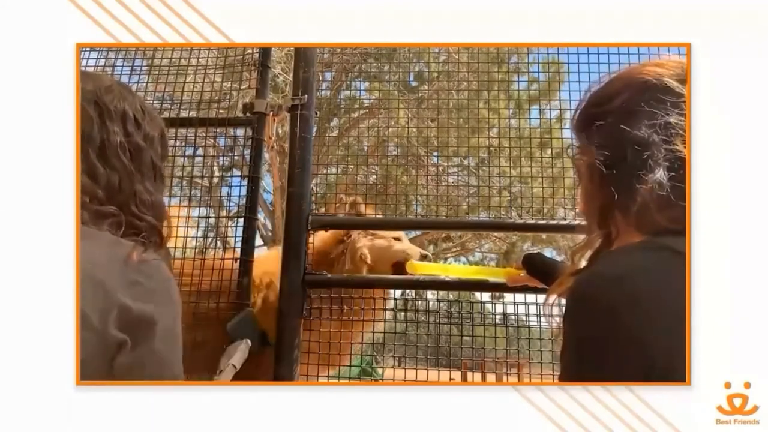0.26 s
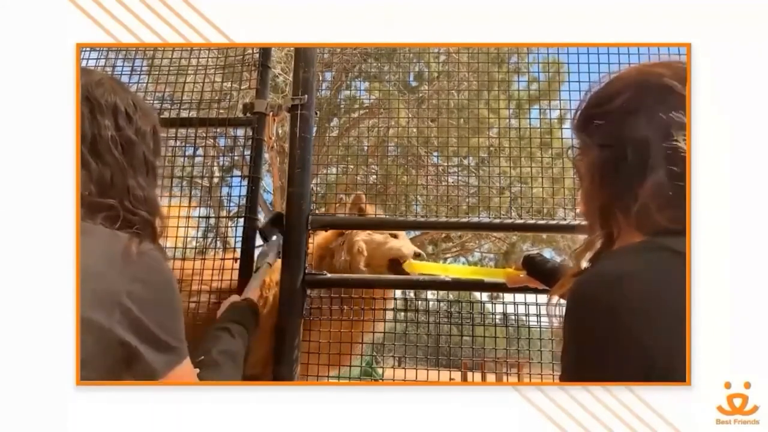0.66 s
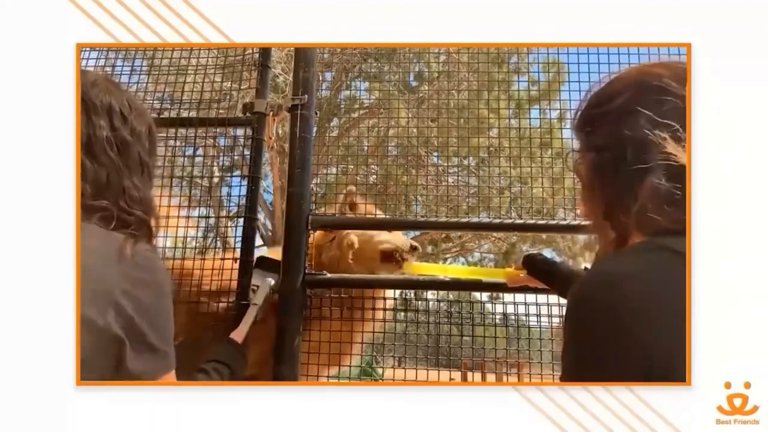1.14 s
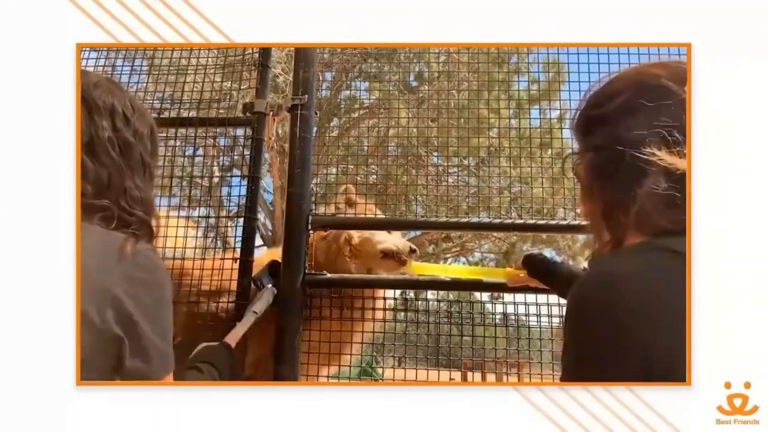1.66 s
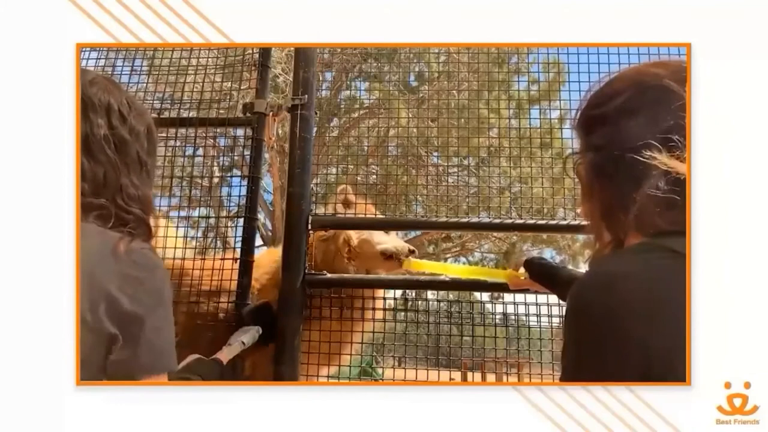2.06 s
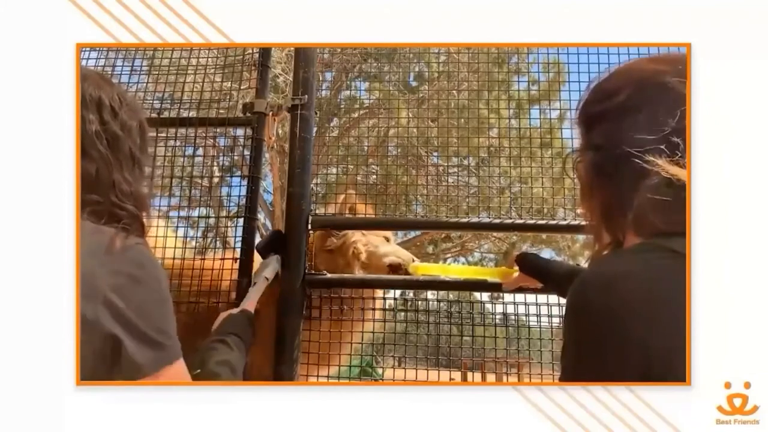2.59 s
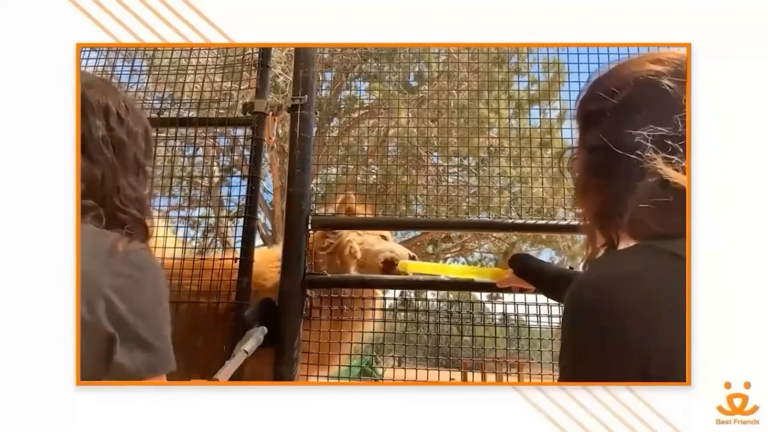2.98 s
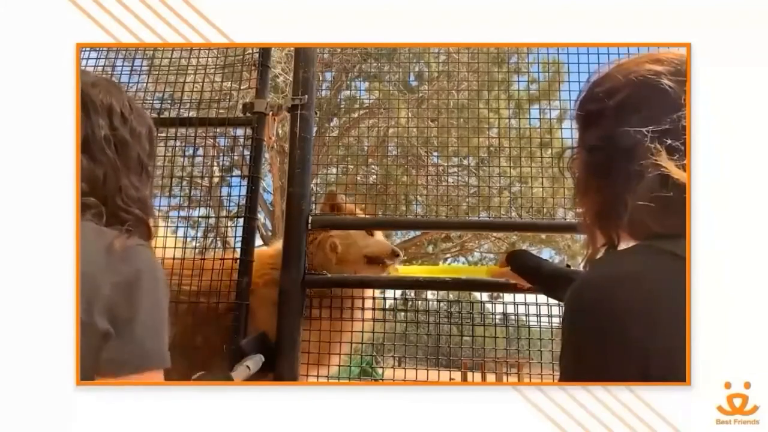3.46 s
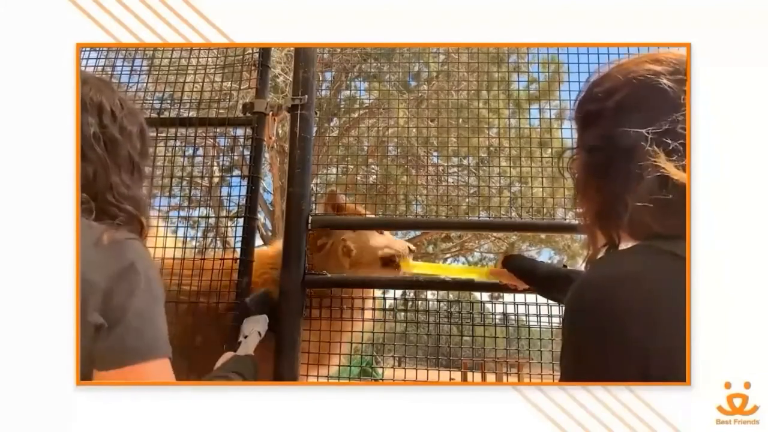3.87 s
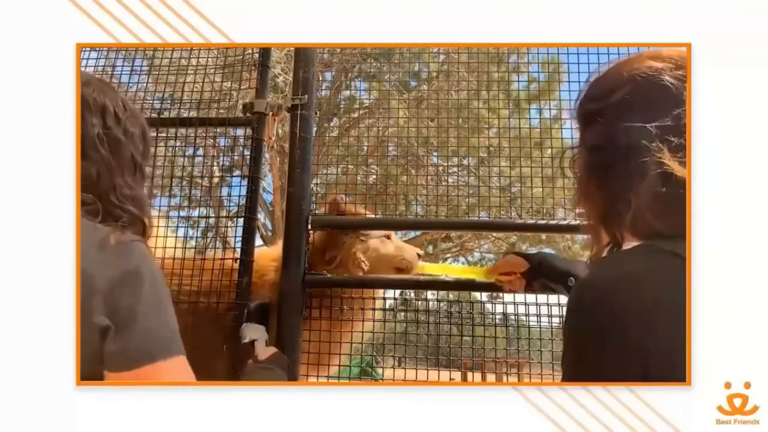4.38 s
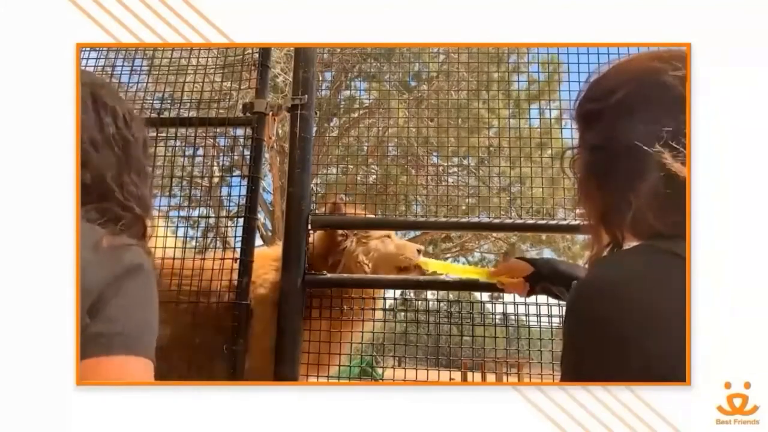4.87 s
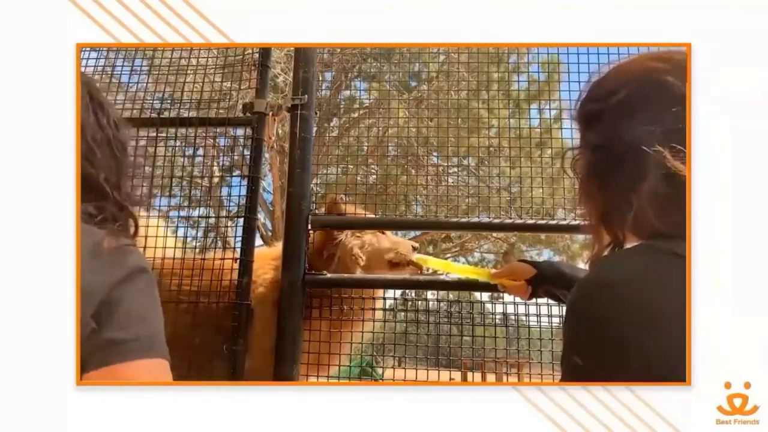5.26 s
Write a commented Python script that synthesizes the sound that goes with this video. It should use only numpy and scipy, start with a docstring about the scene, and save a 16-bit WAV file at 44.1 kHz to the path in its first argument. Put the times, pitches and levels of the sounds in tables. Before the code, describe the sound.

Close, wet clicks and smacks come from a large dog licking food through a wire fence in the open air. Faint bristle strokes rustle its fur, briefly catching the mesh with a slight ring. Underneath, a low, far engine rises slowly, then gives way to gusts of wind buffeting the microphone. The engine hum comes back as the licking and brushing thin out.

```python
"""Outdoors at a wire fence, a big animal licks and smacks at food on a stick while a brush strokes its coat.
Its wet tongue crackles, its lips click and make the mouth ring, and tiny saliva bubbles pop.
The bristles hiss through the fur and now and then scrape the wire, which rings faintly.
Behind it all, a far engine climbs and eases off, and wind buffets the microphone."""
import sys
import numpy as np
from scipy import signal
from scipy.fft import rfft, irfft
from scipy.io import wavfile
from scipy.ndimage import uniform_filter1d

SR = 44100
rng = np.random.default_rng(int(sys.argv[2]) if len(sys.argv) > 2 else 0)


def transcribe(signal):
    """Save signal, clipped to [-1, 1], as a 16-bit WAV file at the path in sys.argv[1]."""
    frames = np.atleast_2d(signal).T
    limited = np.clip(frames, -1, 1)
    pcm = np.round(limited * 32767).astype(np.int16)
    wavfile.write(sys.argv[1], SR, pcm)


N = 244049
T = np.arange(N) / SR

# Tone of the open air: pitch_hz, gain_db
AIR_TONE = [(120, -35), (200, -2.5), (287, -17), (370, -14.5), (696, -22), (980, -30), (1330, -27),
            (2090, -40), (2600, -43), (3060, -53), (5860, -52.5), (8720, -43.5), (10300, -48.5),
            (11900, -52.5), (15000, -68.5)]
# Tone of the wind on the microphone: pitch_hz, gain_db
WIND_TONE = [(20, -52.5), (33, -33.5), (50, -15), (65, -5.5), (82, 0.5), (110, -2.5), (150, -4),
             (184, -16.5), (227, -25.5), (280, -37.5), (400, -42.5), (600, -82)]
# Gusts of wind: peak_s, rise_s, fall_s, level_db
WIND_GUSTS = [(0.08, 0.13, 0.57, -50.5), (0.8, 0.25, 0.33, -48), (3.64, 0.55, 0.31, -38.5),
              (4.03, 0.21, 0.18, -43), (4.59, 0.17, 0.2, -36)]
# Single thumps of wind: peak_s, peak_db, pitch_hz
WIND_THUMPS = [(0.098, -37.5, 78.4), (3.34, -29, 94.4), (3.599, -25, 106), (3.708, -23.5, 95.7),
               (4.079, -27.5, 92), (4.487, -30.5, 73), (4.574, -35.5, 139)]
# Faint gliding hums: start_s, length_s, first_hz, last_hz, level_db
FAINT_HUMS = [(0.0, 0.62, 160.5, 134.7, -49), (2.58, 0.606, 147.3, 164.4, -51)]
# Speed of the far engine: time_s, firing_hz
ENGINE_SPEED = [(0.65, 67), (0.97, 78.5), (1.16, 66.44), (1.34, 79), (1.5, 79.4), (2.3, 94.9), (2.9, 103.6),
                (3.5, 111), (4.8, 85), (4.98, 88.5), (5.15, 83), (5.33, 88.6)]
# Times when the engine works hard: start_s, end_s, build_s, gain_db
ENGINE_PULLS = [(0.72, 3.5, 0.089, -30.5), (4.82, 5.9, 0.16, -29.5)]
# Exhaust resonances, one for each of the first two harmonics: pitch_hz, width_hz, gain_db
EXHAUST_RESONANCES = [(86.94, 32.4, 0), (180, 26.3, -19.5)]
# Tone of the rustling coat: pitch_hz, gain_db
FUR_TONE = [(1200, -36), (2500, 3), (3200, -2.5), (5500, -2.5), (7200, -5.5), (10000, -16), (15000, -44)]
# The coat rustling as the brush slides back: peak_s, fall_s, level_db
FUR_RUSTLES = [(0.1, 0.76, -85.5), (0.59, 0.11, -80.5), (0.85, 0.33, -79), (1.14, 0.35, -79),
               (2.3, 0.42, -83.5), (2.78, 0.15, -85.5), (3.76, 0.35, -85.5)]
# Tone of the hissing bristles: pitch_hz, gain_db
BRISTLE_TONE = [(1500, -48.5), (2500, -19), (3300, -31), (4500, -11.5), (5700, -12), (6900, -1.5),
                (8200, -1.5), (9350, -4.5), (9850, -17.5), (10600, -19), (12500, -15), (15000, -22)]
# Brush strokes: peak_s, rise_s, fall_s, hiss_db, pin_gain_db
BRUSH_STROKES = [ (0.03, 0.22, 0.094, -69.5, -68), (0.15, 0.055, 0.06, -75.5, -92),
                 (0.246, 0.069, 0.057, -71, -54), (0.32, 0.04, 0.022, -65, -72),
                 (0.83, 0.13, 0.1, -75, -75), (1.205, 0.019, 0.02, -72, -76),
                 (1.405, 0.055, 0.037, -74.5, -84.5), (1.599, 0.045, 0.13, -70.5, -80.5),
                 (2.0, 0.14, 0.12, -71.5, -78), (2.11, 0.13, 0.092, -68.5, -48.5),
                 (2.73, 0.048, 0.14, -82, -84), (3.075, 0.099, 0.11, -66, -49),
                 (3.22, 0.075, 0.074, -74, -77), (3.38, 0.16, 0.097, -71.5, -62),
                 (3.66, 0.15, 0.14, -75, -75.5), (3.88, 0.19, 0.13, -78.5, -77),
                 (4.3, 0.21, 0.082, -89, -81.5), (4.57, 0.12, 0.05, -80, -90),
                 (5.08, 0.045, 0.058, -83, -91), (5.488, 0.047, 0.08, -83, -91)]
# Single bristles springing free: start_s, peak_db
BRISTLE_FLICKS = [(0.1163, -58), (0.222, -64), (0.245, -63), (0.325, -66), (0.5034, -66), (0.6031, -61),
                  (0.696, -66), (0.7228, -64), (0.874, -64), (1.2, -60.5), (1.5787, -47.5), (1.7208, -64.5),
                  (2.066, -57), (3.601, -58)]
# The brush catching the fence: start_s, scrape_peak_db, ring_peak_db
FENCE_SCRAPES = [(0.801, -64, -79.5), (1.033, -48, -60), (1.572, -56, -70.5)]
# Resonances of a scrape: pitch_hz, width_hz, gain_db
SCRAPE_RESONANCES = [(2640, 350, -5), (3680, 190, -1.5), (5400, 400, -1.5), (6200, 370, 4.5),
                     (7600, 2500, 3), (12930, 3700, -5.5)]
# Ringing notes of the wire: pitch_hz, gain_db, fade_s (every fade_s is the time to drop 60 dB)
WIRE_NOTES = [(2480, -7.5, 0.34), (3760, -14.5, 0.61), (4800, -15.5, .6), (4823, -12.5, .5),
              (5350, -4.5, 0.81), (5800, -10.5, 0.42), (6022, -0.5, 0.4), (6127, -1.5, 0.34),
              (6060, 0, 0.37), (8030, 4, .25), (8500, -7.5, .16)]
# Saliva bubbles bursting: start_s, pitch_hz, peak_db
SALIVA_BUBBLES = [(0.9545, 2780, -67), (1.9643, 3670, -61), (1.964, 5950, -57), (2.6842, 5840, -66),
                  (2.7385, 2890, -67), (2.756, 3630, -71.5), (3.761, 2360, -69), (4.004, 2680, -69.5),
                  (4.465, 4820, -69.5), (4.5653, 7170, -59.5), (4.6948, 3600, -59.5), (5.0556, 8560, -62.5),
                  (5.0814, 3560, -63.5)]
# Resonances of the mouth around the tongue: pitch_hz, width_hz, gain_db
MOUTH_RESONANCES = [(740, 99, 6.5), (1164, 270, 0), (1720, 470, -12.5), (2370, 260, -20)]
# Licks, about three a second: peak_s, gain_db
TONGUE_LICKS = [(0.03, -66), (0.22, -72), (0.42, -73), (0.63, -74.5), (0.83, -70.5), (1.06, -75),
                (1.31, -70.5), (1.66, -67.5), (2.05, -67.5), (2.75, -81.5), (3.05, -69), (3.36, -71),
                (3.65, -68.5), (3.91, -75.5), (4.02, -81), (4.29, -76), (4.54, -76.5), (5.06, -80.5)]
# Air sucked past the wet tongue: start_s, length_s, level_db, first_hz, last_hz
TONGUE_SLURPS = [(3.61, 0.12, -80.5, 1760, 1670), (3.7, 0.067, -70, 1206, 1204),
                 (3.788, 0.084, -67.5, 1313, 1150), (3.823, 0.055, -66, 814, 740),
                 (3.888, 0.057, -68.5, 1253, 1250)]
# Smacks of lips and tongue: start_s, throat_hz, throat_db, mouth_hz, mouth_db, lip_db, tick_db
LIP_SMACKS = [ (0.2819, 860, -48, 1140, -38.5, -50.5, -47), (0.388, 770, -48, 966, -51, -64, -70),
              (0.397, 770, -56, 1030, -58, -71, -71), (0.7652, 696, -63, 1300, -64, -65, -53.5),
              (0.7978, 595, -40.5, 1260, -46, -51.5, -33.5), (1.2935, 660, -56, 1200, -65, -70, -71),
              (1.3438, 660, -47, 1190, -56, -60, -62.5), (1.4067, 627, -48.5, 1210, -56.5, -66.5, -64.5),
              (1.6582, 670, -58, 1400, -72, -63, -70), (1.9635, 697, -69.5, 1250, -77, -72, -60),
              (2.0369, 690, -51.5, 1280, -67, -62, -66), (2.0667, 810, -54, 1250, -63, -63, -49),
              (2.5014, 784, -44, 1108, -44.5, -47, -52.5), (2.5127, 726, -52.5, 1250, -59.5, -62, -63),
              (2.529, 900, -61.5, 1400, -64, -62.5, -64.5), (2.7163, 750, -68.5, 1475, -68, -68, -65),
              (2.7777, 630, -57.5, 1250, -58, -55, -49), (2.825, 600, -47, 1260, -59, -62, -58),
              (3.0291, 791, -50, 1202, -66.5, -62.5, -64), (3.0653, 810, -56, 1300, -73, -65, -49),
              (3.091, 746, -51, 1270, -74, -72, -54), (3.1070, 690, -60, 1340, -75, -70, -64),
              (3.2175, 790, -70.5, 1400, -77, -77.5, -56), (3.896, 796, -59, 1230, -57, -71, -59),
              (3.9927, 840, -54.5, 1290, -60, -65, -75.5), (4.3057, 855, -63, 1380, -68, -75, -81),
              (4.6808, 835, -49.5, 1190, -52, -55.5, -48.5), (4.7664, 780, -55.5, 1180, -66, -68, -55.5)]


def undb(db):
    """Turn decibels into a number to multiply by."""
    return 10 ** (np.asarray(db) / 20)


def fade(t, fade_s):
    """Die away, dropping 60 dB every fade_s seconds."""
    return undb(-60 * t / fade_s)


def unit(x):
    """Scale to an average (rms) level of 1."""
    return x / np.sqrt(np.mean(x ** 2))


def peak(x, db):
    """Scale to a peak level."""
    return x * undb(db) / np.max(np.abs(x))


def add(out, start_s, x):
    """Mix x into out, beginning at start_s."""
    i = max(int(start_s * SR), 0)
    out[i:i + len(x)] += x[:N - i]


def band(x, hz, width_hz):
    """One resonance: let through the sound near one pitch."""
    return signal.lfilter(*signal.iirpeak(min(hz, .45 * SR), hz / width_hz, fs=SR), x)


def resonances(x, rows):
    """Steep resonances side by side; each row is pitch_hz, width_hz, gain_db."""
    return sum(undb(db) * band(band(x, hz, 2 * width), hz, 2 * width) for hz, width, db in rows)


def colour(x, tone):
    """Shape the lows and highs of x by rows of pitch_hz, gain_db, at an average level of 1."""
    hz, db = np.transpose(tone)
    bins_hz = np.maximum(np.fft.rfftfreq(N, 1 / SR), 1)
    gain = undb(np.interp(np.log(bins_hz), np.log(hz), db))
    return unit(irfft(rfft(x) * gain, N))


def wander(per_s):
    """A smooth random wobble that picks a new value per_s times a second."""
    step = int(SR / per_s)
    held = np.repeat(rng.standard_normal(N // step + 1), step)
    return unit(uniform_filter1d(uniform_filter1d(held, step), step)[:N])


def clicks(per_s, spread_db):
    """Tiny clicks at random moments, a few much larger than the rest."""
    size = undb(spread_db * np.minimum(rng.exponential(size=N), 4))
    return unit((rng.random(N) < per_s / SR) * size * rng.choice([-1, 1], N))


def swells(rows, rest_db, roundness):
    """Loudness swelling over a resting level; a swell is 20 dB down at the ends of its rise and fall."""
    power = undb(rest_db) ** 2
    for peak_s, rise_s, fall_s, db in rows:
        away = np.maximum((peak_s - T) / rise_s, (T - peak_s) / fall_s)
        power = power + undb(db - 20 * np.minimum(away, 10) ** roundness) ** 2
    return np.sqrt(power)


def air(start_db=-64, drop_db_per_s=0.72, flicker_db=1.2):
    """The quiet wash of the open country, slowly settling."""
    wash = colour(rng.standard_normal(N), AIR_TONE)
    return wash * undb(start_db - drop_db_per_s * T + flicker_db * wander(per_s=11))


def wind(thump_s=0.0098, sink_s=0.07):
    """Swirls of air rumble on the microphone; the largest give it a short thump that sinks in pitch."""
    out = colour(rng.standard_normal(N), WIND_TONE) * swells(WIND_GUSTS, rest_db=-45.5, roundness=2.48)
    t = np.arange(-SR // 20, SR // 20) / SR
    push = np.exp(-.5 * (t / thump_s) ** 2)
    for peak_s, db, hz in WIND_THUMPS:
        cycles = hz * sink_s * (1 - np.exp(-t / sink_s))
        add(out, peak_s + t[0], undb(db) * push * np.cos(2 * np.pi * cycles))
    return out


def hums(fade_share=0.22):
    """A faint low tone fades in, glides evenly and fades out."""
    out = np.zeros(N)
    for start_s, length_s, first_hz, last_hz, db in FAINT_HUMS:
        n = int(length_s * SR)
        tone = np.sin(2 * np.pi * np.cumsum(np.linspace(first_hz, last_hz, n)) / SR)
        add(out, start_s, np.sqrt(2) * undb(db) * tone * signal.windows.tukey(n, fade_share))
    return out


def engine(waver_db=0.5, release_s=0.092):
    """Only the lowest exhaust tones carry this far; they boom near resonance and waver in moving air."""
    firing_hz = np.interp(T, *np.transpose(ENGINE_SPEED))
    phase = 2 * np.pi * np.cumsum(firing_hz) / SR
    exhaust, effort = np.zeros((2, N))
    for harmonic, (boom_hz, width_hz, db) in enumerate(EXHAUST_RESONANCES, 1):
        hz = harmonic * firing_hz
        off_tune = (hz - boom_hz ** 2 / hz) / width_hz
        exhaust += undb(db) * np.sin(harmonic * phase) / (1 + off_tune ** 2)
    for start_s, end_s, build_s, db in ENGINE_PULLS:
        build = 1 - np.exp(-np.maximum(T - start_s, 0) / build_s)
        effort += undb(db) * build * np.clip((end_s - T) / release_s, 0, 1)
    return np.sqrt(2) * exhaust * effort * undb(-waver_db * wander(per_s=12))


def with_echoes(x, tail_db=-12, post_db=-9):
    """The stick and posts throw back quick echoes; ground and bodies scatter a weak tail."""
    t = np.arange(SR // 4) / SR
    tail = rng.standard_normal(len(t)) * fade(t, fade_s=0.15) * (t > .003)
    echoes = undb(tail_db) * tail / np.linalg.norm(tail)
    for delay_s in (.0016, .0037):
        i = int(delay_s * SR)
        echoes[i:i + 2] += undb(post_db) * np.array([1, -1])  # thin posts return only the treble
    return x + signal.fftconvolve(x, echoes)[:N]


def brush(pin_hz=8980, pin_trim_db=-7.5, sing_share=0.6, flutter_db=2.0):
    """Bristles click through rustling fur; at the height of a stroke the brush's pins sing one pitch."""
    hiss_rows = [(s, rise, fall, db) for s, rise, fall, db, _ in BRUSH_STROKES]
    pin_rows = [(s, sing_share * rise, sing_share * fall, db) for s, rise, fall, _, db in BRUSH_STROKES]
    fur_rows = [(s, 0.16, fall, db) for s, fall, db in FUR_RUSTLES]  # all rise in 0.16 s
    tips = clicks(per_s=2400, spread_db=3.2)
    hiss = colour(tips * undb(flutter_db * wander(per_s=90)), BRISTLE_TONE)
    plucks = clicks(per_s=1200, spread_db=2.2)
    pins = unit(resonances(plucks, [(pin_hz, 170, 0), (pin_hz, 900, -13), (13200, 1200, -26)]))
    fur = colour(clicks(per_s=6000, spread_db=4.0), FUR_TONE)
    out = hiss * swells(hiss_rows, rest_db=-100, roundness=1.9)
    out += pins * swells(pin_rows, rest_db=-94.5, roundness=1.2) * undb(pin_trim_db)
    out += fur * swells(fur_rows, rest_db=-96, roundness=1.6)
    t = np.arange(SR // 40) / SR
    for start_s, db in BRISTLE_FLICKS:
        snap = rng.standard_normal(len(t)) * fade(t, fade_s=0.0036)
        add(out, start_s, peak(resonances(snap, [(7300, 1300, -2), (pin_hz, 600, 0)]), db))
    return out


def fence(rise_s=0.013):
    """The brush scrapes along the mesh and leaves the wires ringing faintly."""
    out = np.zeros(N)
    t = np.arange(SR) / SR
    swell = 1 - np.exp(-(t / rise_s) ** 2)
    for start_s, scrape_db, ring_db in FENCE_SCRAPES:
        rub = clicks(per_s=7200, spread_db=2.1)[:SR] * swell * fade(t, fade_s=0.18)
        scrape = resonances(rub, SCRAPE_RESONANCES)
        ring = sum(undb(db) * fade(t, fade_s) * np.sin(2 * np.pi * (hz * t + rng.random()))
                   for hz, db, fade_s in WIRE_NOTES)
        add(out, start_s, peak(scrape, scrape_db) + peak(ring * swell, ring_db))
    return out


def bubbles(rise_s=.0004, glide_s=0.14):
    """Each saliva bubble rings for a few milliseconds, its pitch climbing as it opens."""
    out = np.zeros(N)
    t = np.arange(SR // 25) / SR
    loudness = (1 - np.exp(-t / rise_s)) * fade(t, fade_s=0.0047)
    for start_s, hz, db in SALIVA_BUBBLES:
        pip = np.sin(2 * np.pi * hz * t * (1 + t / (2 * glide_s)))
        add(out, start_s, peak(pip * loudness, db))
    return out


def tongue(lick_trim_db=-1, rise_s=0.068, fall_s=0.14, slurp_width_hz=320):
    """The rough wet tongue crackles through the mouth's resonances; in a slurp one swells and slides."""
    drag = swells([(s, rise_s, fall_s, db) for s, db in TONGUE_LICKS], rest_db=-85.5, roundness=2.0)
    crackle = unit(resonances(clicks(per_s=1400, spread_db=5.2), MOUTH_RESONANCES))
    out = crackle * drag * undb(lick_trim_db)
    keep_lows = signal.butter(2, slurp_width_hz / 2, fs=SR, output="sos")
    for start_s, length_s, db, first_hz, last_hz in TONGUE_SLURPS:
        n = int(length_s * SR)
        gurgle = signal.sosfilt(keep_lows, rng.standard_normal((2, SR // 4)))[:, :n]
        phase = 2 * np.pi * np.cumsum(np.linspace(first_hz, last_hz, n)) / SR
        slurp = gurgle[0] * np.cos(phase) + gurgle[1] * np.sin(phase)  # noise around the sliding pitch
        add(out, start_s, undb(db) * np.hanning(n) ** .5 * unit(slurp))
    return out


def smacks(lip_hz=1708, open_s=0.0024, peel_s=0.0014, snap_gain_db=-8, spit_gain_db=-24):
    """A film of saliva peels with a bright tick, the opened mouth rings, and droplets crackle after."""
    out = np.zeros(N)
    t = np.arange(SR // 10) / SR
    opening = 1 - np.exp(-t / open_s)
    peeling = 1 - np.exp(-(t / (2 * peel_s)) ** 2)
    for start_s, throat_hz, throat_db, mouth_hz, mouth_db, lip_db, tick_db in LIP_SMACKS:
        film = rng.standard_normal(len(t)) * fade(t - peel_s, fade_s=0.0034)
        droplets = rng.standard_normal(len(t)) ** 3 / 4  # cubing makes the noise spiky
        burst = peeling * (film + droplets * undb(spit_gain_db) * fade(t, fade_s=0.06))
        tick = resonances(burst, [(7620, 1000, -4.5), (8560, 150, 6.5), (11500, 2100, -18)])
        snap = resonances(burst, [(2350, 310, 0.5), (3290, 520, -5.5)])
        notes = [(throat_hz, throat_db, 0.012), (mouth_hz, mouth_db, 0.013), (lip_hz, lip_db, 0.013)]
        ring = sum(peak(np.sin(2 * np.pi * hz * t) * opening * fade(t, fade_s), db)
                   for hz, db, fade_s in notes)
        add(out, start_s, ring + peak(snap, mouth_db + snap_gain_db))
        add(out, start_s - peel_s / 2, peak(tick, tick_db))
    return out


def scene():
    """The close sounds at the fence, over engine, wind and open air."""
    close = with_echoes(smacks() + bubbles() + fence() + brush()) + tongue()
    return (close + engine() + hums() + wind() + air())[None]


def record(dry, dip_hz=10800, dip_width_hz=1800, dip_db=-12, top_hz=14900):
    """The microphone has a dip in the high treble; the recorder cuts off the very top."""
    heard = dry - (1 - undb(dip_db)) * band(dry, dip_hz, dip_width_hz)
    return signal.sosfilt(signal.ellip(8, .2, 70, top_hz, fs=SR, output="sos"), heard)


dry = scene()
out = record(dry)
transcribe(out)
```